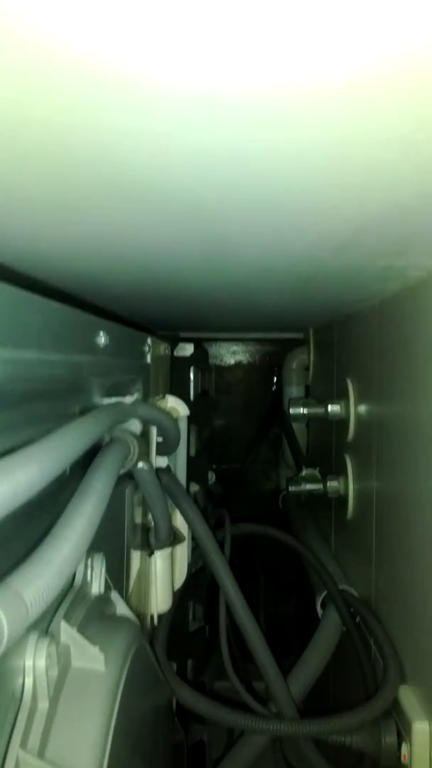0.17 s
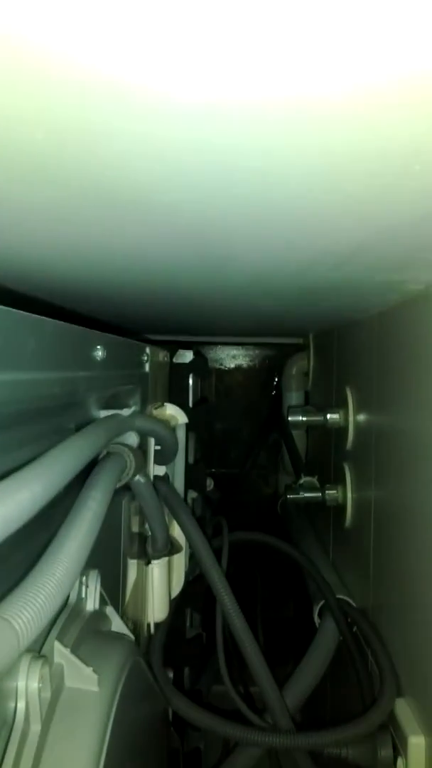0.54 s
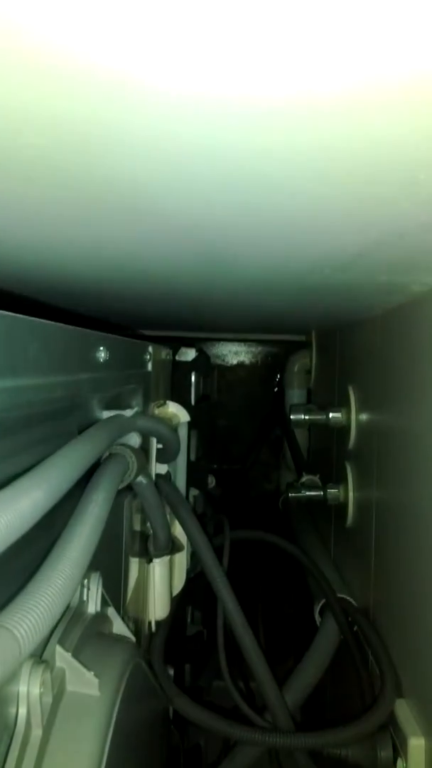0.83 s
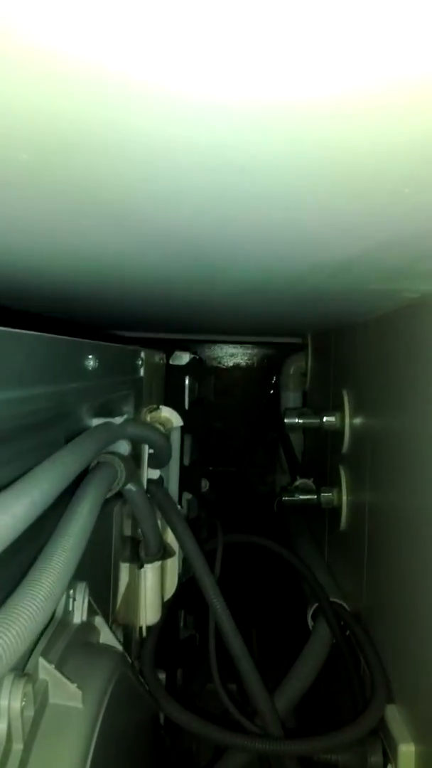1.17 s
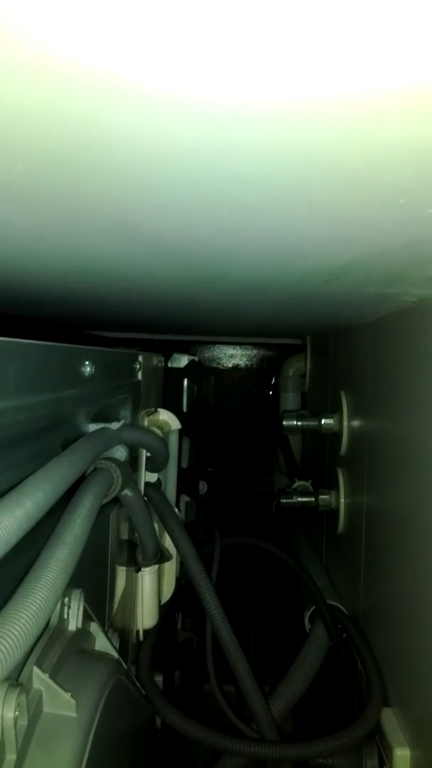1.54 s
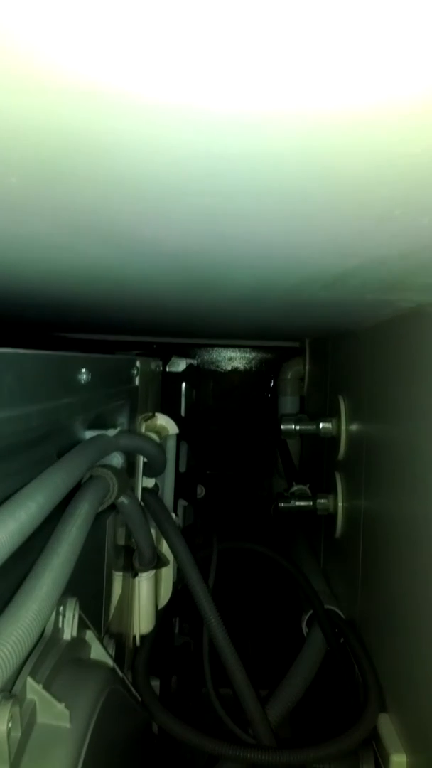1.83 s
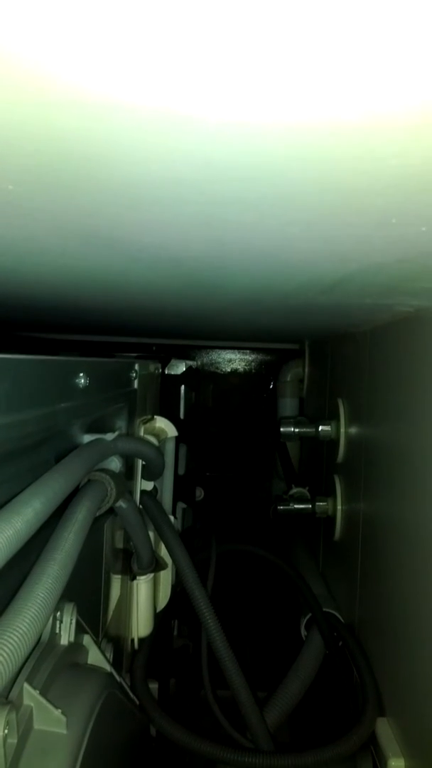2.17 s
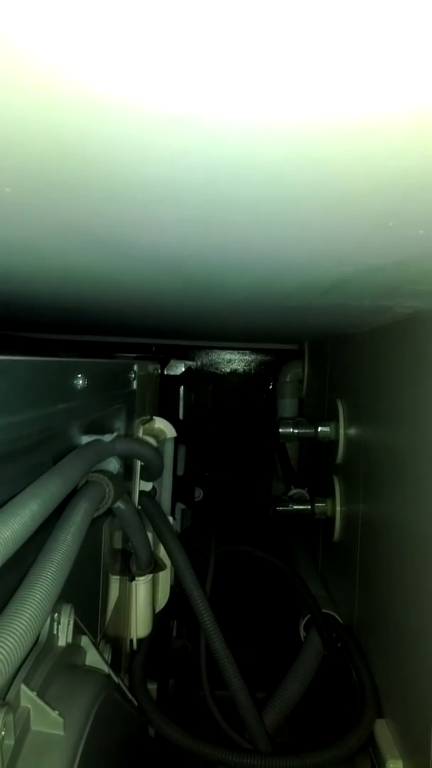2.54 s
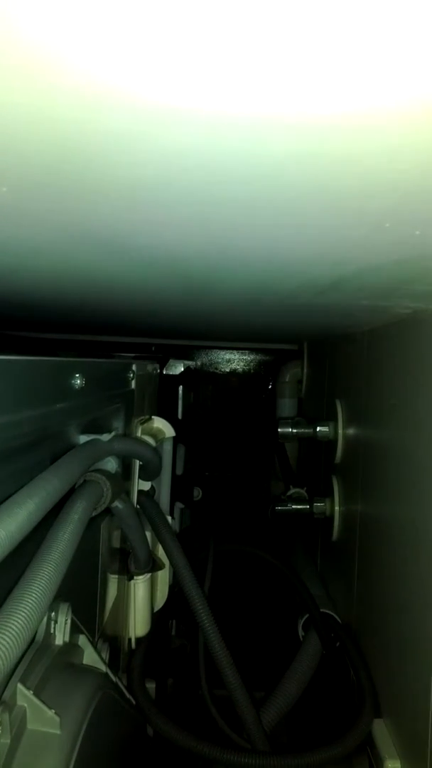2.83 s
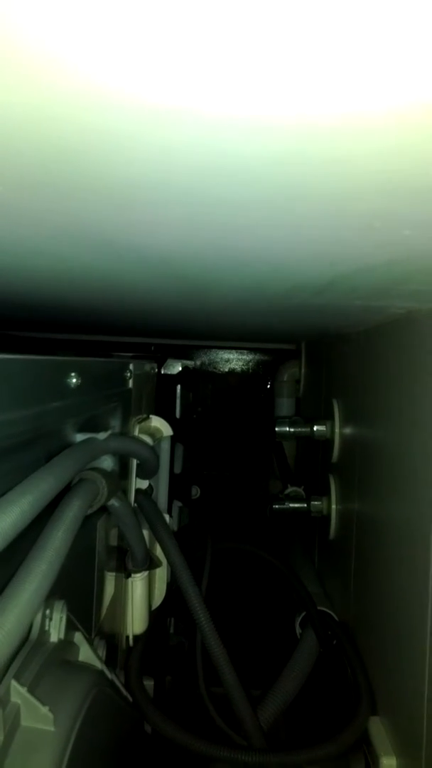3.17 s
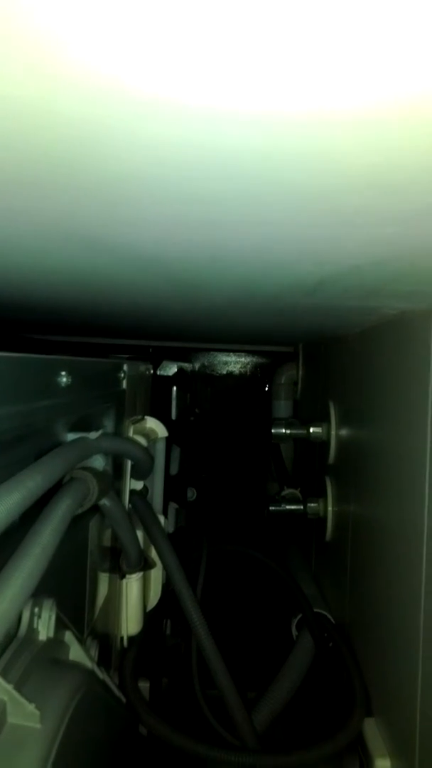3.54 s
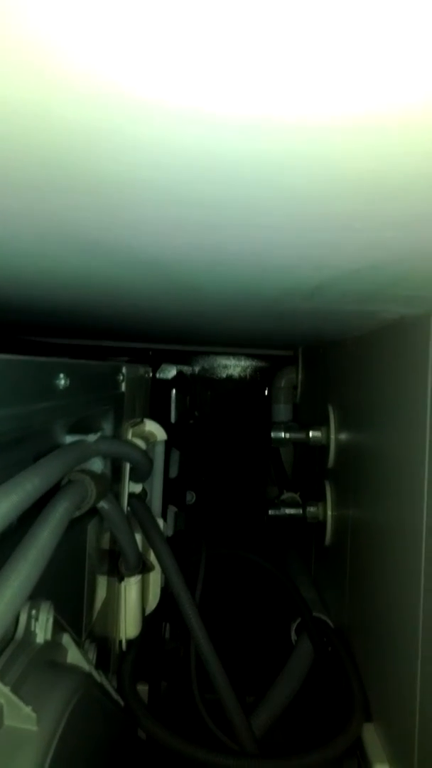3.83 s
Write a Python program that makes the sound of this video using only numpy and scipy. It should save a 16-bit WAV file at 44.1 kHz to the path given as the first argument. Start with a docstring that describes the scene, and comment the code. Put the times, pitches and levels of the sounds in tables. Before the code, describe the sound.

A drain pump's low hum and water rush stop midway, leaving gurgles, faint hum and knocks

```python
"""In the narrow gap behind a washing machine, the drain pump hums at twice the mains rate over rushing water.
The pump cuts out, its hum rings down and the water gurgles back; a weaker hum, faint whines and hiss remain.
Blips, glugs and small ticks are scattered about; towards the end come a low thud and two knocks on a panel.
Hums and whines are sines, water is flickering noise with ringing bubbles, and the panel is a bank of
struck modes; echoes in the gap colour the rush and the hiss."""
import sys
import numpy as np
from scipy import signal
from scipy.fft import rfft, irfft
from scipy.io import wavfile
from scipy.ndimage import uniform_filter1d

SR = 44100
rng = np.random.default_rng(int(sys.argv[2]) if len(sys.argv) > 2 else 0)


def wav_record(signal):
    """Record a signal, one row per channel, as 16-bit PCM in the file named by sys.argv[1]."""
    frames = np.transpose(np.atleast_2d(signal))
    bounded = np.clip(frames, -1, 1)
    # unit amplitude maps onto the largest positive 16-bit level
    quanta = np.round(bounded * 32767).astype(np.int16)
    wavfile.write(sys.argv[1], SR, quanta)


def gain_from_db(level_db):
    """Turn a decibel level (scalar or array-like) into a linear amplitude factor."""
    decades = np.asarray(level_db, float) / 20
    return 10 ** decades


N = 176400

# Harmonics of the pump hum: [multiple, level/dB, t60/s after cut-out, waver/dB]
PUMP_HARMONICS = [(1, -22, 1.09, 0.37), (2, -31, 1.5, 0.05), (3, -35.5, .25, 2.5), (4, -44, 0.22, 1.5),
                  (5, -72, .25, 4.5)]
# Harmonics of the hum that stays: [multiple, level/dB]
STANDING_HARMONICS = [(1, -53), (2, -54), (3, -42), (4, -56), (5, -64.5)]
# Steady tones: [f/Hz, level/dB]
STEADY_TONES = [(42.2, -60), (48.6, -42), (452, -61), (1227, -80), (1430, -66.5), (2396, -71), (3494, -67),
                (3865, -67), (5416, -82), (5556, -65.5)]
# Tones in each round of the pulsing whine: [f/Hz, level/dB, delay/s, length/s]
WHINE_ROUND = [(1905, -59, 0.00086, 0.023), (2915, -57, 0.00039, 0.0076), (4860, -64, 0.0035, 0.034),
               (4250, -81, 0.021, 0.02), (4010, -61.5, 0.033, .026)]
# Course of the rush in the hoses, before its trim: [t/s, level/dB]
FLOW_COURSE = [(0.0, -38.5), (0.02, -45), (0.16, -42), (0.22, -45), (0.34, -44), (0.36, -41), (0.38, -44.5),
               (0.52, -44), (0.58, -45.5), (0.88, -42), (0.93, -45), (1.5, -45), (1.52, -47), (1.83, -43.5),
               (1.98, -44), (2.03, -57.5), (2.13, -50), (2.16, -55)]
# Spectrum of the rush: [f/Hz, relative level/dB]
RUSH_SPECTRUM = [(290, -10), (500, 0), (648, -11.5), (713, -2.5), (949, -11), (2370, -5), (3190, -2),
                 (4740, -6), (5820, -11.5), (11500, -18.5), (13000, -13)]
# Spectrum of the low rumble: [f/Hz, relative level/dB]
RUMBLE_SPECTRUM = [(30, -9), (60, -11), (85, -5), (125, -12.5), (157, 2.5), (185, -2), (220, -6),
                   (245, -11.5), (300, -14), (358, -7), (380, -21.5), (450, -18)]
# Echoes between wall and cabinet, against the direct sound: [delay/s, gain]
GAP_ECHOES = [(.0011, .1), (.0027, -.17), (.0046, .2), (.0079, .18), (.0123, -.18), (.0187, .16),
              (.0271, -.14), (.0389, .12)]
# Spectrum of the rumbling room tone: [f/Hz, relative level/dB]
ROOM_SPECTRUM = [(22, -12), (33, 3), (45, 5), (60, 2), (75, 7), (130, -10.5), (240, -6), (330, -2),
                 (450, -15), (570, -4.5), (700, -21)]
# Spectrum of the bright hiss: [f/Hz, relative level/dB]
HISS_SPECTRUM = [(600, -4), (726, -9), (900, -11), (1270, -4.5), (1550, -10), (1930, -9.5), (2680, -11),
                 (4300, -7.5), (5500, -9.5), (6000, -11), (6900, -12.5), (9000, -9.5), (10300, -11.5),
                 (12000, -6), (12900, -5), (13600, 1.5), (14100, 0), (14600, -9), (15200, 0.5),
                 (15600, -10), (16500, -20)]
# Course of the hiss, before its trim: [t/s, level/dB]
HISS_COURSE = [(0.0, -44.5), (1.31, -42.5), (1.75, -43), (2.34, -45), (4.0, -46)]
# Single blips, glugs and a low thud, each a ringing pitch: [t/s, level/dB, f/Hz, t60/s]
SINGLE_RINGS = [(0.012, -33, 1037, 0.081), (.355, -33.5, 4600, 0.061), (0.687, -36, 1006, 0.16),
                (2.105, -27.5, 388, 0.15), (2.226, -28.5, 390, 0.29), (2.275, -28, 390, .1),
                (2.368, -27.5, 219, 0.17), (2.39, -35.5, 745, 0.16), (2.48, -31, 320, 0.089),
                (2.548, -33.5, 1110, 0.054), (2.978, -38, 148, 0.12), (2.987, -48, 205, 0.1)]
# Ticks, before their trim, each with a puff of hiss: [t/s, level/dB, puff level/dB]
SMALL_TICKS = [(0.1361, -34, -41), (2.055, -40, -57), (2.175, -47, -43), (2.7422, -28.5, -40)]
# Course of the water running back, before its trim: [t/s, level/dB]
BACKWASH_COURSE = [(2.04, -58), (2.046, -66), (2.07, -56), (2.082, -63), (2.108, -44), (2.17, -46.5),
                   (2.25, -43.5), (2.37, -46), (2.394, -38), (2.406, -41.5), (2.622, -48.5), (2.634, -58),
                   (2.8, -57)]
# Spectrum of the backwash ahead of the hose resonances: [f/Hz, relative level/dB]
BACKWASH_SPECTRUM = [(120, 4.5), (220, -8), (400, -8), (600, -9.5), (800, -13.5), (1200, -14), (2500, -24)]
# Hose resonances, before their trim: [f/Hz, width/Hz, relative level/dB]
HOSE_RESONANCES = [(227, 10, 7), (320, 42, 9), (390, 17, 4), (449, 23, 3.5), (728, 24, 10.5),
                   (573, 29, -13)]
# Course of the fine droplets, before their trim: [t/s, level/dB]
SPRAY_COURSE = [(2.2, -57.5), (2.3, -45.5), (2.386, -57), (2.392, -45.5), (2.602, -51.5), (2.612, -48.5),
                (2.674, -59), (2.712, -51), (2.78, -65)]
# Spectrum of the droplets: [f/Hz, relative level/dB]
SPRAY_SPECTRUM = [(700, -7), (1200, -2.5), (2000, -2), (3500, -4.5), (6000, -16)]
# Knocks, before the contact filter: [t/s, level/dB, contact sharpness as top f/Hz]
PANEL_KNOCKS = [(3.3393, -24, 6900), (3.53, -32.5, 1360)]
# Panel modes, before each knock's own spread: [f/Hz, relative level/dB, t60/s]
PANEL_MODES = [(996, -3, .2), (1044, -3, .22), (1357, 0, .14), (1422, -3, .14), (1520, -9, .05),
               (1593, -9, .25), (1692, -2, .19), (1724, -2, .25), (1771, -13, .42), (1883, -5, .24),
               (2175, -12, .12), (2492, -20, .1), (5100, -24, .06), (5265, -17, .12)]

TIME = np.arange(N) / SR   # s
HUM_HZ, PUMP_OFF_S = 99.8, 2.004
HARMONIC_LAG_RAD = 1.4   # each multiple lags the one below
STANDING_RAD = -2.0   # phase of the standing hum against the pump's
BEAT_PEAK_S = 3.36   # phase reference of the hums, where the beat peaks
WHINE_ROUNDS_PER_S = 15.37


def rms_one(x):
    """Scale to rms 1."""
    return x / np.sqrt(np.mean(x ** 2) + 1e-20)


def curve(rows):
    """Level course in dB, straight between its points and silent outside its span."""
    s, db = np.transpose(rows)
    return np.interp(TIME, s, db, left=-120, right=-120)


def drift(rate):
    """Smooth random motion with spread 1: white noise through two equal low-pass poles at rate Hz."""
    step = 40   # samples; the drift is drawn coarsely and joined by straight lines
    r = np.exp(-2 * np.pi * rate * step / SR)
    white = rng.standard_normal(N // step + 2002)
    slow = signal.lfilter([1], [1, -2 * r, r * r], white)[2000:]   # leave out the filter's start-up
    return np.interp(np.arange(N) / step, np.arange(len(slow)), rms_one(slow))


def decay_per_sample(t60):
    """Gain per sample that falls 60 dB in t60 seconds."""
    return gain_from_db(-60 / (t60 * SR))


def ring(clicks, hz, t60):
    """A two-pole resonator: a unit click sets a decaying sine of height 1 ringing."""
    r, w = decay_per_sample(t60), 2 * np.pi * hz / SR
    return signal.lfilter([0, np.sin(w)], [1, -2 * r * np.cos(w), r * r], clicks + 1e-18)


def train(s, db):
    """Clicks of the given levels at the given times."""
    clicks = np.zeros(N)
    clicks[(np.atleast_1d(s) * SR).astype(int)] = gain_from_db(db)
    return clicks


def butter(x, order, edges, kind):
    """Butterworth filter with its edges in Hz."""
    return signal.sosfilt(signal.butter(order, edges, kind, fs=SR, output="sos"), x)


def colour(x, spectrum):
    """Shape the spectrum along the points, in straight lines over log frequency."""
    hz, db = np.transpose(spectrum)
    f = np.log(np.arange(N // 2 + 1) * SR / N + 1)
    return irfft(rfft(x) * gain_from_db(np.interp(f, np.log(hz), db, left=-90, right=-90)), N)


def patchy_noise(spectrum, patchy_db, rate):
    """Coloured noise whose roughly half-octave bands flicker partly together; rms 1."""
    hz = np.transpose(spectrum)[0]
    together = drift(rate / 3)
    edges = np.geomspace(hz[0], hz[-1], int(2 * np.log2(hz[-1] / hz[0])) + 2)
    white = rng.standard_normal((2, N))
    out = 0
    for k, edge in enumerate(zip(edges, edges[1:])):
        band = butter(white[k % 2], 2, edge, "band")   # neighbours use separate noise
        out = out + band * gain_from_db(patchy_db * (0.25 * together + drift(rate)))
    return rms_one(colour(out, spectrum))


def bubbles(per_s, low_hz, high_hz, cycles, spectrum):
    """Random collapses of mixed size each ring a few cycles at one of 16 pitches; rms 1."""
    sizes = gain_from_db(3.0 * np.minimum(rng.exponential(1, N), 4))
    signs = rng.choice([-1, 1], N)
    clicks = sizes * signs * (rng.random(N) < per_s / SR)
    dealt = rng.integers(0, 16, N)
    pitches = np.geomspace(low_hz, high_hz, 16)
    rings = sum(ring(clicks * (dealt == k), hz, cycles / hz) for k, hz in enumerate(pitches))
    return rms_one(colour(rings, spectrum))


def gap(x):
    """A few echoes in the narrow space add to the direct sound; the taps keep unit energy."""
    lag, gain = np.transpose(GAP_ECHOES)
    taps = np.zeros(int(.04 * SR))
    taps[0] = 1
    taps[(lag * SR).astype(int)] = gain
    return signal.fftconvolve(x, taps / np.sqrt(np.sum(taps ** 2)))[:N]


def resonate(x, hz, width):
    """A two-pole resonance with gain 1 on top and the given width in Hz."""
    r = np.exp(-np.pi * width / SR)
    poles = [1, -2 * r * np.cos(2 * np.pi * hz / SR), r * r]
    return signal.lfilter([(1 - r * r) / 2, 0, (r * r - 1) / 2], poles, x)


def sine(db, phase):
    """A sine of the given rms level."""
    return np.sqrt(2) * gain_from_db(db) * np.cos(phase)


def hum_phase(multiple):
    """Phase of one multiple of the hum, each lagging the one below."""
    turn = 2 * np.pi * HUM_HZ * (TIME - BEAT_PEAK_S)
    return multiple * turn - HARMONIC_LAG_RAD * (multiple - 1)


def pump_hum():
    """Wavering harmonics that each ring down at their own pace once the pump cuts out."""
    after = np.maximum(TIME - PUMP_OFF_S, 0)
    out = 0
    for k, db, t60, waver in PUMP_HARMONICS:
        level = db - 60 * after / t60 + waver * drift(5.3)
        out = out + sine(level, hum_phase(k))
    return out


def standing_hum():
    """Weaker harmonics at the same pitch that carry on throughout, wavering slowly."""
    return sum(sine(db + 1.3 * drift(1.8), hum_phase(k) + STANDING_RAD) for k, db in STANDING_HARMONICS)


def beating_tone():
    """A tone just under the hum beats with it, ever more slowly as its pitch closes in."""
    beat_hz, slows_hz_per_s = 5.7, 1.6   # beat rate at its peak time, and how fast it falls
    u = TIME - BEAT_PEAK_S
    behind = 2 * np.pi * (beat_hz * u - slows_hz_per_s * u * u / 2)
    return sine(-48.5, hum_phase(1) + STANDING_RAD - behind)


def steady_tones():
    """Sines of fixed pitch whose levels waver slowly."""
    return sum(sine(db + 1.2 * drift(1.0), 2 * np.pi * (hz * TIME + rng.random())) for hz, db in STEADY_TONES)


def warbling_tone():
    """A sine whose pitch rises fast and slides down more slowly, once in two rounds of the whine."""
    centre_hz, swing_hz, top_s = 557, 24, 3.385
    rise = .2   # share of each cycle spent rising
    cycle = np.pi * WHINE_ROUNDS_PER_S * (TIME - top_s) + 2 * np.pi * rise
    hz = centre_hz + swing_hz * signal.sawtooth(cycle, rise)
    return sine(-57 + 2.2 * drift(19.0), 2 * np.pi * np.cumsum(hz) / SR)


def whine():
    """Faint high tones switch softly on and off in a fixed round."""
    start_s = 3.668   # one round starts here and the others line up with it
    into = (TIME - start_s) % (1 / WHINE_ROUNDS_PER_S)
    out = 0
    for hz, db, delay, length in WHINE_ROUND:
        on = 1. * (into > delay) * (into < delay + length)
        out = out + uniform_filter1d(on, size=130) * sine(db, 2 * np.pi * hz * into)
    return out


def hose_rush():
    """Turbulent noise and a fizz of tiny bubbles follow the flow, heard through the gap's echoes."""
    noise = patchy_noise(RUSH_SPECTRUM, patchy_db=1.07, rate=7.0)
    fizz = bubbles(1500, 573, 4450, 7.5, RUSH_SPECTRUM)
    return gain_from_db(curve(FLOW_COURSE) + 3) * gap(noise + gain_from_db(-7.5) * fizz)


def rumble():
    """Low flickering noise that dies away once the pump cuts out."""
    t60 = .7   # s
    after = np.maximum(TIME - PUMP_OFF_S, 0)
    return gain_from_db(-35.5 - 60 * after / t60) * patchy_noise(RUMBLE_SPECTRUM, patchy_db=1.0, rate=21.0)


def room_tone():
    """A quiet bed of low noise."""
    return gain_from_db(-47.5) * patchy_noise(ROOM_SPECTRUM, patchy_db=0.25, rate=4.9)


def hiss():
    """A nearly steady bright noise, heard through the gap's echoes."""
    noise = patchy_noise(HISS_SPECTRUM, patchy_db=0.48, rate=13.0)
    return gap(gain_from_db(curve(HISS_COURSE) + 0.5) * noise)


def single_rings():
    """Each blip, glug or thud is a decaying sine set off by a push half a cycle long."""
    out = 0
    for s, db, hz, t60 in SINGLE_RINGS:
        push = 1.18 * uniform_filter1d(train(s, db), size=int(SR / hz / 2))
        out = out + ring(push, hz, t60)
    return out


def ticks():
    """Two tiny bright rings close in pitch, then a brief puff of hiss."""
    tick_hz, t60, puff_s = 9900, 0.017, 0.025   # puff_s is half the full swell
    s, db, puff_db = np.transpose(SMALL_TICKS)
    click = train(s, db - 1)
    rings = ring(click, tick_hz, t60) + ring(click, 0.99 * tick_hz, t60)
    swell = np.hanning(int(2 * puff_s * SR))[int(.7 * puff_s * SR):]   # starts partway up
    puff = signal.fftconvolve(train(s, puff_db), swell)[:N]
    noise = butter(rng.standard_normal(N), 2, [7500, 15500], "band")
    return rings + puff * rms_one(noise)


def backwash():
    """Water running back: noise and gurgling bubbles excite the resonances of the hoses."""
    noise = patchy_noise(BACKWASH_SPECTRUM, patchy_db=0.5, rate=25.0)
    gurgles = bubbles(250, 159, 1500, 12.0, BACKWASH_SPECTRUM)
    water = noise + gain_from_db(-2) * gurgles
    hoses = sum(gain_from_db(db + 5) * resonate(water, hz, width) for hz, width, db in HOSE_RESONANCES)
    return gain_from_db(curve(BACKWASH_COURSE) + 6) * rms_one(water + hoses)


def spray():
    """Fine droplets over the backwash: flickering noise with many small, high bubble rings."""
    noise = patchy_noise(SPRAY_SPECTRUM, patchy_db=3.5, rate=12.0)
    droplets = bubbles(1000, 870, 5100, 15.0, SPRAY_SPECTRUM)
    return gain_from_db(curve(SPRAY_COURSE) - 1.5) * (noise + droplets)


def knocks():
    """Each knock strikes the panel's modes, a crack and a blurred ring through a contact of its own softness."""
    white = rng.standard_normal((2, N))
    crack = rms_one(butter(white[0], 2, [1900, 7500], "band"))
    blur = rms_one(butter(white[1], 3, [1250, 1950], "band"))
    out = 0
    for s, db, sharp_hz in PANEL_KNOCKS:
        click = train(s, db)
        spread_db = rng.normal(0, 1, len(PANEL_MODES))   # no two strikes excite the modes alike
        body = sum(gain_from_db(g + e) * ring(click, hz, t60) for (hz, g, t60), e in zip(PANEL_MODES, spread_db))
        for noise, noise_db, t60 in (crack, -11.5, 0.12), (blur, -12, .3):
            fade = signal.lfilter([1], [1, -decay_per_sample(t60)], click + 1e-18)
            body = body + gain_from_db(noise_db) * noise * fade
        out = out + butter(body, 6, sharp_hz, "low")
    return butter(out, 6, 1230, "high")


def scene():
    """Sum of the machine, the water, the background and the small sounds, in one channel."""
    machine = pump_hum() + standing_hum() + beating_tone() + steady_tones() + warbling_tone() + whine()
    water = hose_rush() + rumble() + backwash() + spray()
    background = room_tone() + hiss()
    small_sounds = single_rings() + ticks() + knocks()
    return (machine + water + background + small_sounds)[None]


def band_limit(x):
    """A steep low-pass at the top of the band."""
    return signal.sosfilt(signal.butter(12, 15660, fs=SR, output="sos"), x)


def record(dry):
    """Hands on the finished mix."""
    return band_limit(dry)


dry = scene()
out = record(dry)
wav_record(out)
```